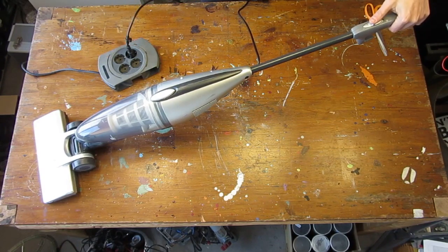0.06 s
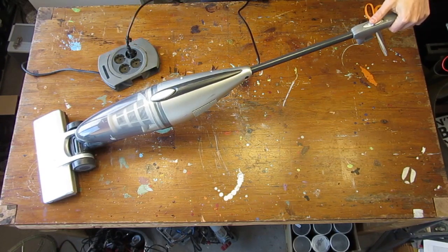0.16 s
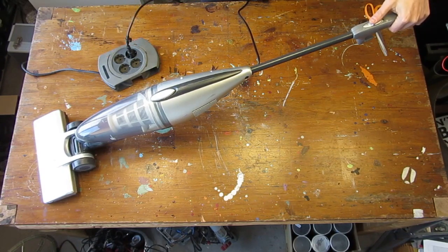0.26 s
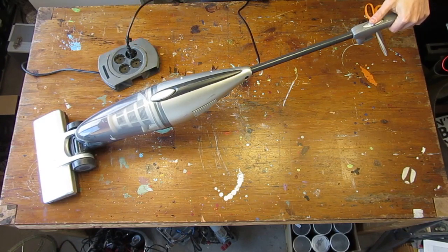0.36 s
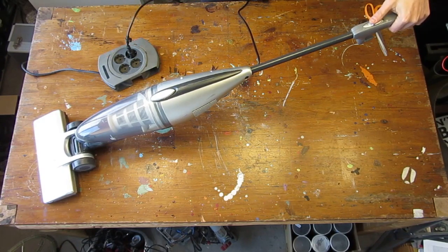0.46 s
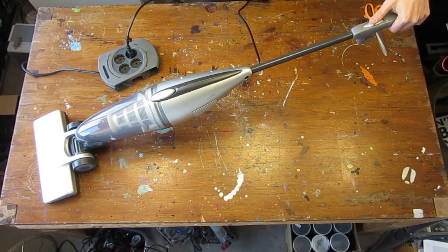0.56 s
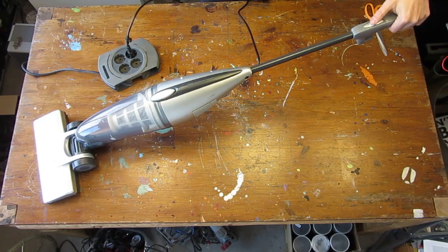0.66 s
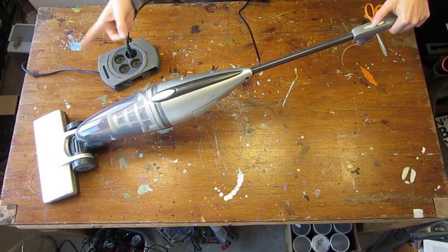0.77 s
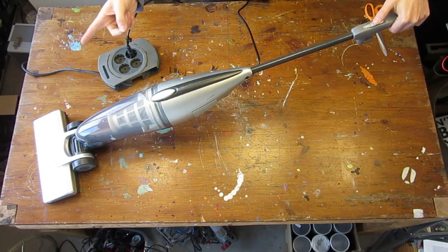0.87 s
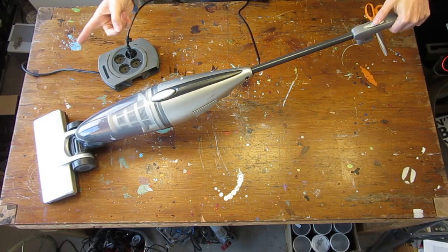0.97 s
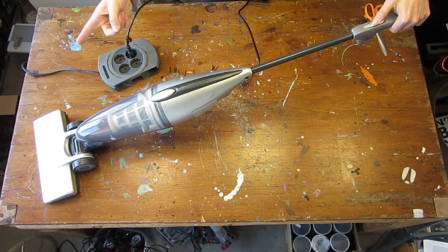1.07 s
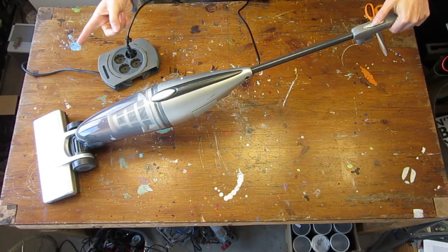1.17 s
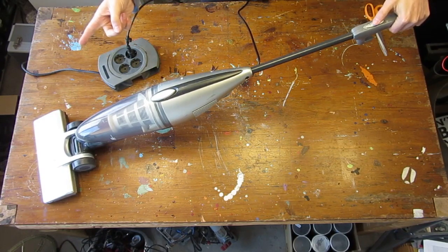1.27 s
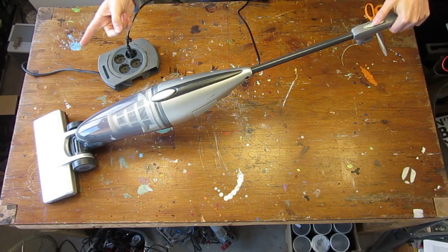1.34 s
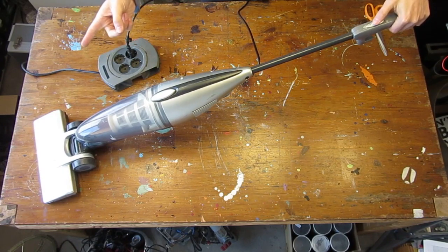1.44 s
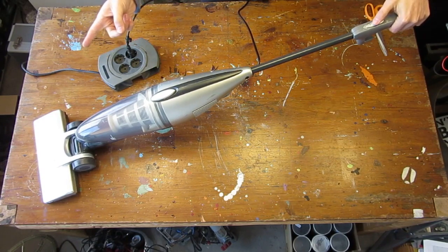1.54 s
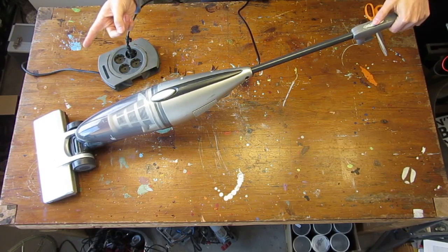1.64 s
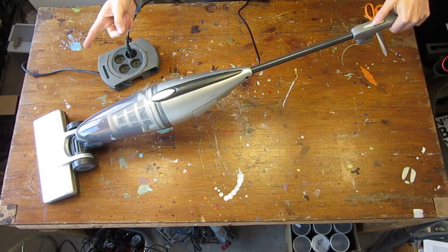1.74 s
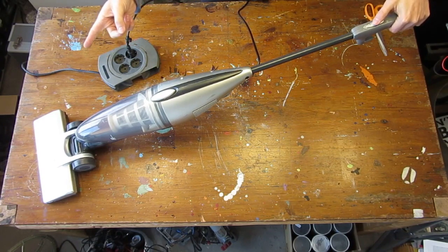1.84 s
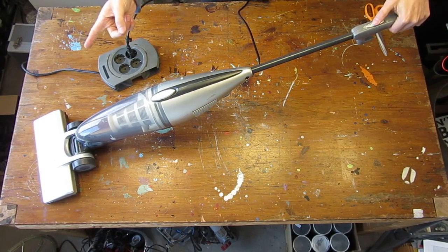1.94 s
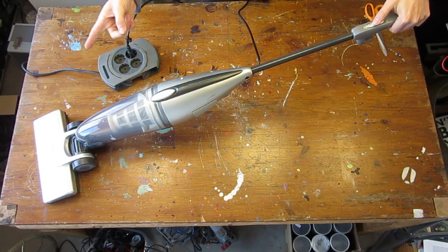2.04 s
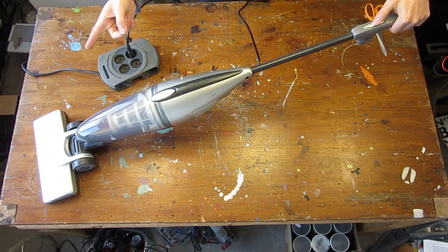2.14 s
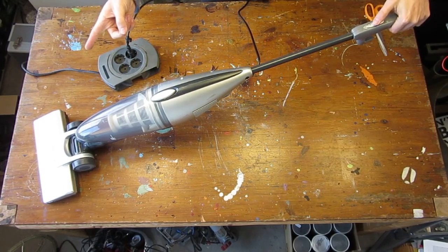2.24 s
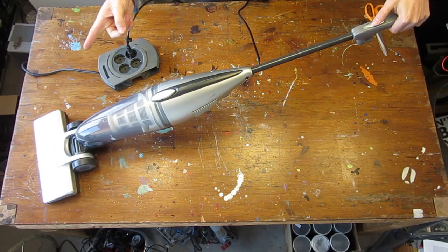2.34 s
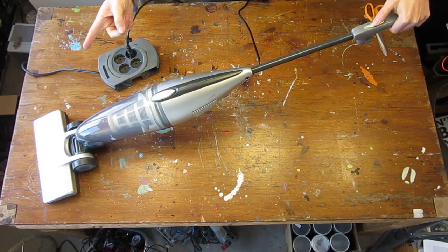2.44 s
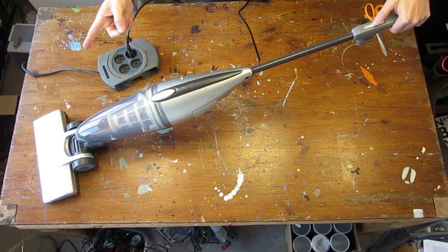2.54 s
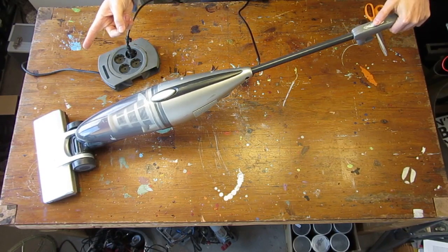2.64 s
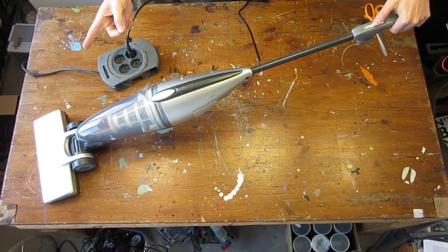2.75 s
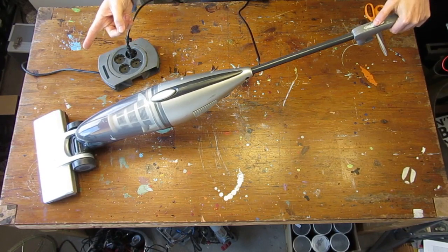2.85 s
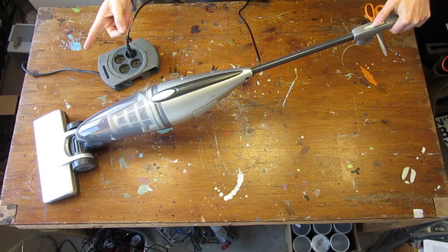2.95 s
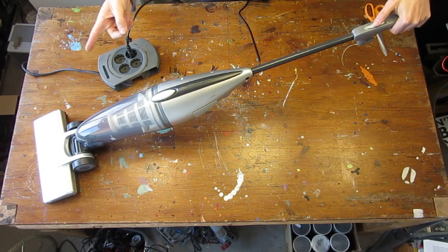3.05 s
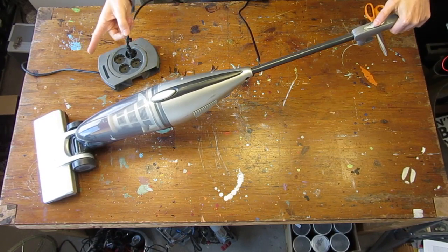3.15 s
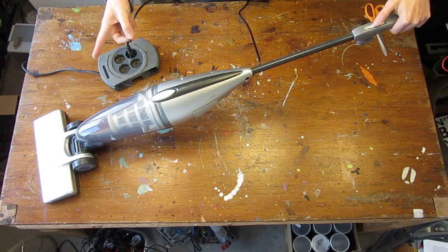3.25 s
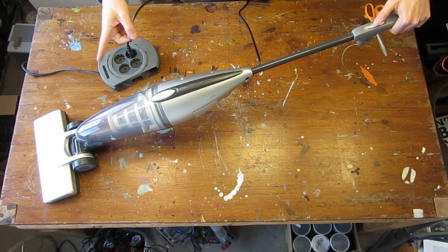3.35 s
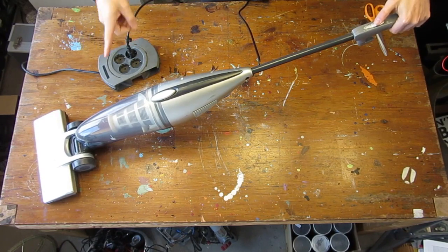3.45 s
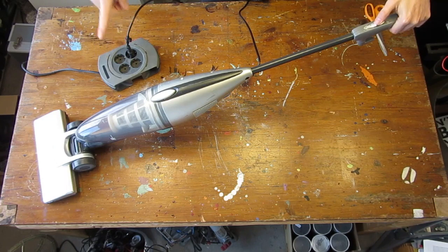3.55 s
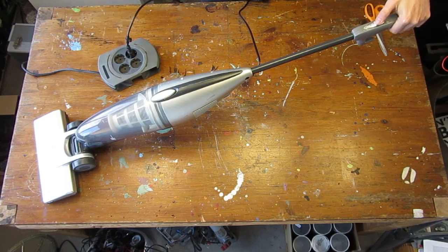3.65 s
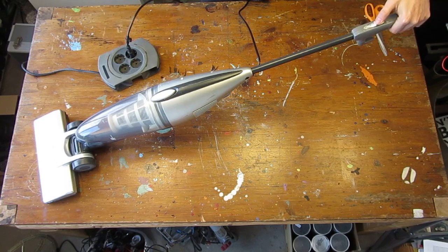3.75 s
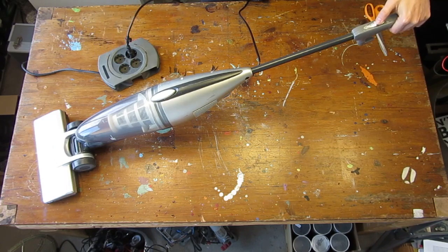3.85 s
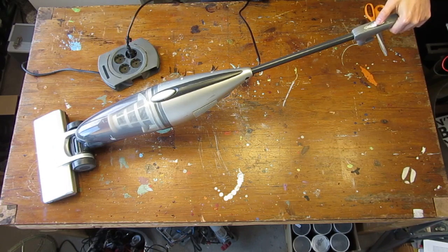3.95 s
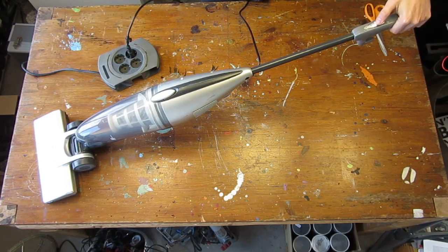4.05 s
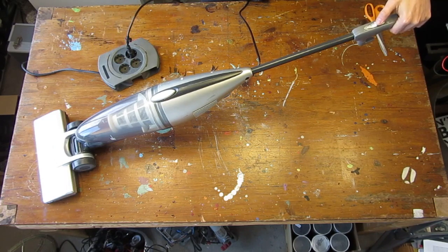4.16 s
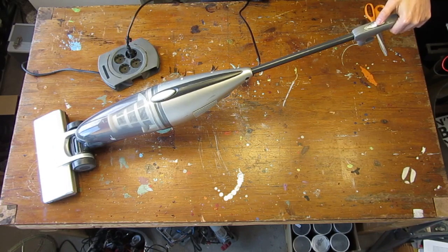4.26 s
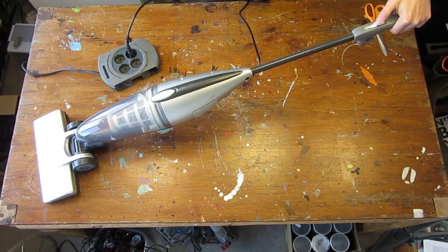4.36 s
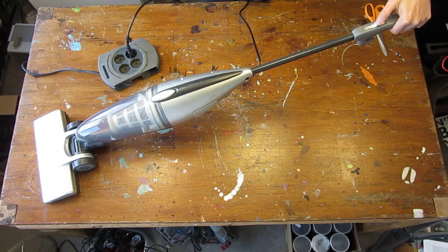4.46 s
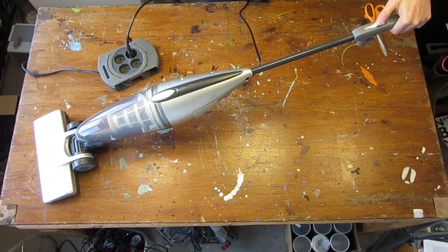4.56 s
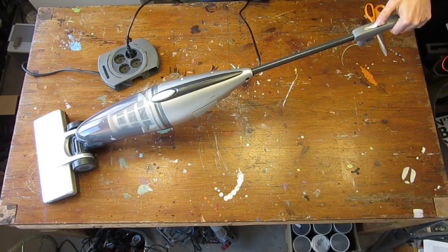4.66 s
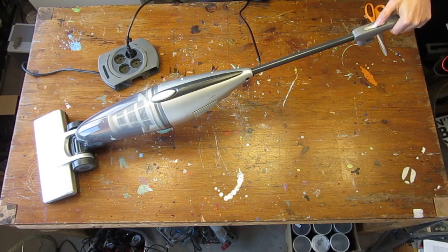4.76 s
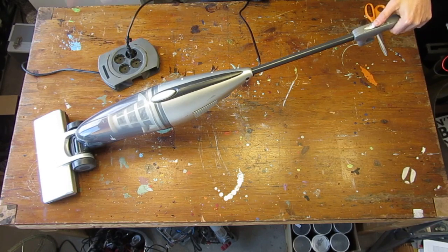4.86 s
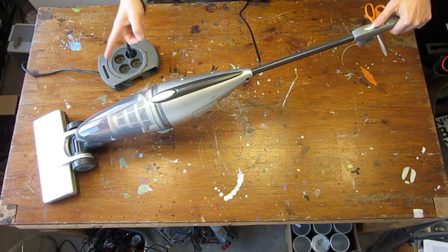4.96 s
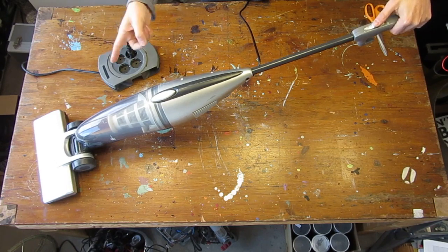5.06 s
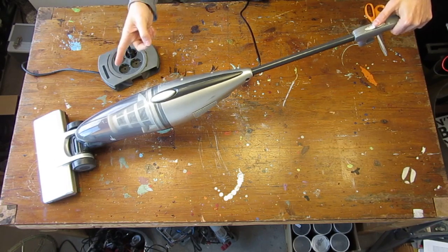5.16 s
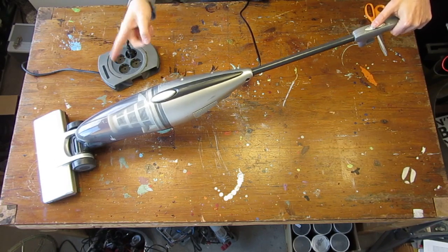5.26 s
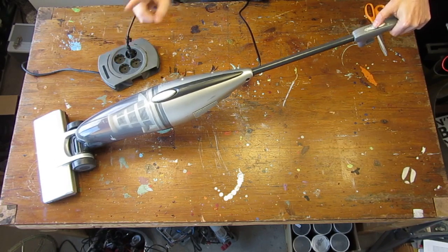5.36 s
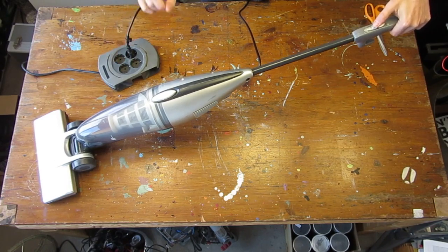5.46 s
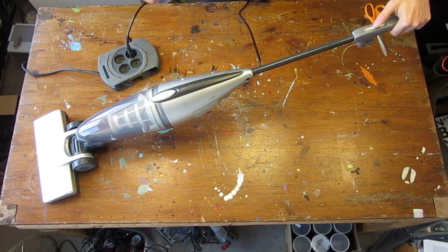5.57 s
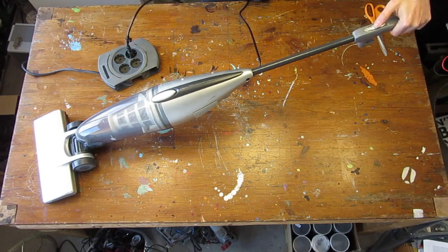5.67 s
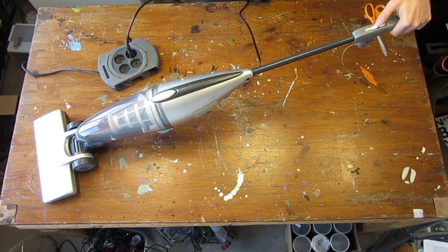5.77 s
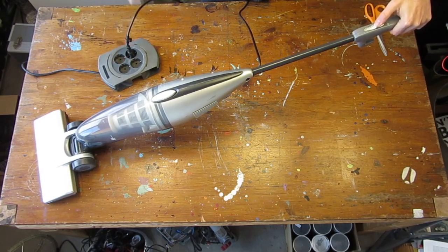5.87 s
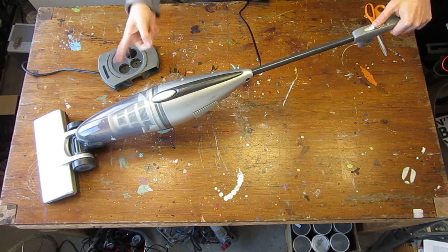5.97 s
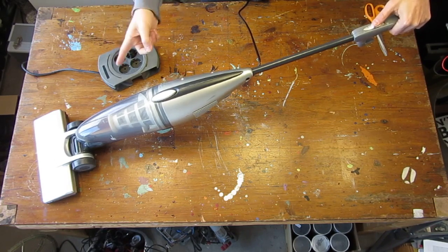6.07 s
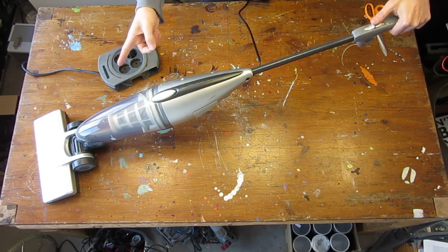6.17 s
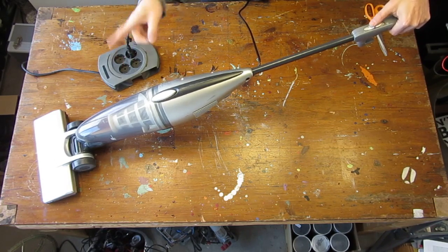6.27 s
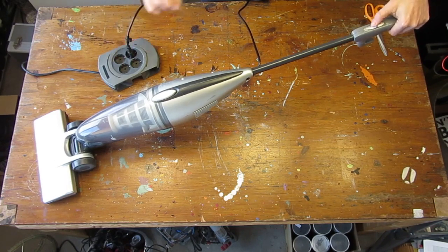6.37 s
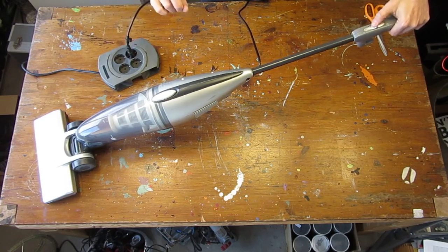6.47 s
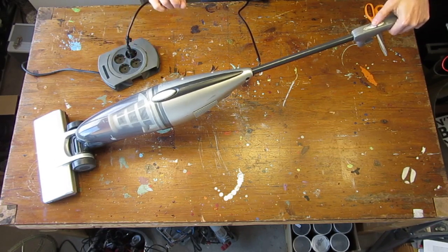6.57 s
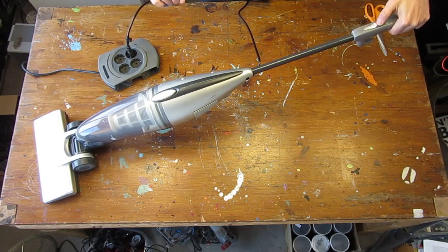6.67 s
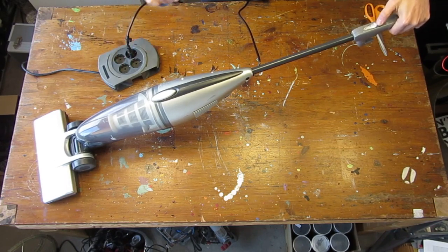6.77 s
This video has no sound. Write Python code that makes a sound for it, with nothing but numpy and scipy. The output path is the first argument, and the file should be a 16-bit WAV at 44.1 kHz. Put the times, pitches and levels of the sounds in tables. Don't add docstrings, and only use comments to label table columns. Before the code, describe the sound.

A small stick vacuum runs steadily from the start, close by on a wooden bench: a hard mid hum, a high fan whine, roaring air and bright hiss. At about 0.87 s a plastic switch snaps with a spark of noise and the motor coasts, its pitch sliding down and hiss thinning. Light scuffs or knocks come near 1.9 and 2.5 s; from about 2.4 s the slowing rotor rattles, brushes tick, and a faint squeal passes around 2.9 to 3.5 s. It sinks to a low, quiet whir by 4.8 s. Handling clicks at 4.9 s and a sharp snap at 5.0 s restart it with a buzzing, rough, rapidly rising whine. It clicks off at 5.46 s and falls, clicks on at 6.06 s and surges up, then off at 6.5 s, still coasting down at the end in a small dry workshop.

```python
import sys
import numpy as np
from scipy import signal
from scipy.fft import rfft, irfft
from scipy.io import wavfile
from scipy.ndimage import uniform_filter1d

SR = 44100
rng = np.random.default_rng(int(sys.argv[2]) if len(sys.argv) > 2 else 0)


def store_pcm(level_fs):
    pcm = np.round(np.clip(level_fs, -1, 1) * 32767).astype(np.int16)
    wavfile.write(sys.argv[1], SR, np.atleast_2d(pcm).T)


def level_to_linear(level):
    exponent = np.asarray(level, float) / 20
    return 10 ** exponent


N = 300321
LEAD = round(.4 * SR)
START_HZ = 642.7
RIPPLE_HZ = 103


def rms_one(x):
    return x / np.sqrt(np.mean(x ** 2) + 1e-20)


def in_time(rows):
    s, *columns = np.transpose(rows)
    return [np.interp(np.arange(N) / SR, s, c) for c in columns]


def at_hz(points, hz):
    point_hz, db = np.transpose(points)
    return np.interp(np.log(np.maximum(hz, 1)), np.log(point_hz), db)


def drift(rate_hz):
    r = np.exp(-80 * np.pi * rate_hz / SR)
    noise = rng.standard_normal(N // 40 + 2002)
    slow = signal.lfilter([1], [1, -2 * r, r * r], noise)[2000:]
    return np.interp(np.arange(N) / 40, np.arange(len(slow)), rms_one(slow))


def resonance(x, hz, width_hz):
    r = np.exp(-np.pi * width_hz / SR)
    zeros = np.array([1, 0, -1]) * (1 - r * r) / 2
    return signal.lfilter(zeros, [1, -2 * r * np.cos(2 * np.pi * hz / SR), r * r], x)


def butter(x, order, hz, kind="low"):
    return signal.sosfilt(signal.butter(order, hz, kind, fs=SR, output="sos"), x)


def coloured(x, spectrum):
    hz = np.arange(N // 2 + 1) * SR / N
    closed = [(spectrum[0][0] / 2, spectrum[0][1] - 40)] + list(spectrum)
    return irfft(rfft(x, N) * level_to_linear(at_hz(closed, hz)), N)


# frequency in Hz, likeness 0..1.
LIKENESS = [(30, 1), (70, 0.94), (500, .99), (1000, 0.98), (2000, 0.93), (4000, 0.71), (8000, 0.74),
            (14000, 0.75)]


def stereo_noise():
    mid, side = rfft(rng.standard_normal((2, N)))
    alike = np.clip(at_hz(LIKENESS, np.arange(N // 2 + 1) * SR / N), 0, 1)
    return irfft(np.sqrt(1 + alike) * mid + np.sqrt(1 - alike) * side * [[1], [-1]], N) / np.sqrt(2)


def workshop(x, t60_s, wet_db, side_db):
    fade = level_to_linear(-60 * np.arange(SR // 2) / SR / t60_s)
    mid, side = rng.standard_normal((2, SR // 2)) * fade / np.sqrt(np.sum(fade ** 2))
    tails = level_to_linear(wet_db) * mid + level_to_linear(side_db) * side * [[1], [-1]]
    tails[:, 0] = 1
    return signal.fftconvolve(x[None], tails, axes=1)[:, :len(x)]


# start in seconds, 1 on / 0 off.
SUPPLY = [
    (-.4, 1),
    (.8347, 0),
    (5.0077, 1),
    (5.448, 0),
    (6.0596, 1),
    (6.4779, 0),
]
TOP_HZ, RUN_UP_S, RUN_UP_SHAPE = 636.2, .1863, .5881
FRICTION_HZ, DRAG_PER_S = 144.66, .2086


def rotor():
    t = (np.arange(N + LEAD) - LEAD) / SR
    hz, supply, last_hz = np.full(N + LEAD, START_HZ), np.ones(N + LEAD), START_HZ
    for (start, on), (end, _) in zip(SUPPLY[1:], SUPPLY[2:] + [(N, 0)]):
        span = (t >= start) & (t < end)
        since = t[span] - start
        if on:
            short = 1 - (last_hz / TOP_HZ) ** (1 / RUN_UP_SHAPE)
            hz[span] = TOP_HZ * (1 - short * np.exp(-since / RUN_UP_S)) ** RUN_UP_SHAPE
        else:
            hz[span] = FRICTION_HZ * np.tan(np.arctan(last_hz / FRICTION_HZ) - DRAG_PER_S * since)
        supply[span], last_hz = on, hz[span][-1]
    return hz, signal.lfilter([.0015], [1, -.9985], supply, zi=[1])[0]


# frequency in Hz, width in Hz,
# level in dB, sign.
HUM_MODES = [(205.7, 5.2, -8.5, -1), (240, 8.2, -13.5, 1), (264.7, 8.4, -6.5, -1), (281.3, 4.8, -11.5, -1),
             (328.6, 11, -22, -1), (357, 11.6, -30, 1), (395, 25, -10.5, 1), (412, 22, -12, -1),
             (418, 6.1, -36, -1), (449.2, 25, -14, 1), (487, 6, -14, 1), (507.6, 8.5, -8, -1),
             (533.2, 8.3, -11.5, -1), (550.2, 11.7, -11.5, -1), (574.5, 17.7, -10.5, 1),
             (598.4, 6.9, -15.5, -1), (617, 18.7, -12, -1), (639, 15.7, -19, -1),
             (88, 7, -35, 1), (101, 8, -32, -1), (142, 14, -30, 1), (178, 12, -23, -1)]


def rotor_hum(turns, hz, supply):
    force = (hz / START_HZ) ** 1.63 * (1 + 0.52 * supply) * np.sin(2 * np.pi * turns)
    hum = 0
    for mode_hz, width_hz, db, sign in HUM_MODES:
        hum = hum + np.sign(sign) * level_to_linear(db) * resonance(force, mode_hz, width_hz)
    return workshop(hum, 0.12, wet_db=-51.0, side_db=-24.5)[:, LEAD:]


# multiple of shaft speed, level at full speed in dB,
# power of speed, loss when coasting in dB, gain by starting current in dB.
BLADES = [(2, -35, .1, -9, 0), (6, -44, 8, 0, 0), (7, -31.5, .1, 7, -60), (14, -26.5, 9.5, 4, 55),
          (21, -48, 2.4, 0, 30), (11, -49, 2.5, 6, 60), (12, -41, 1.7, -3, 100), (13, -40, 5, 4, 30),
          (17, -50, 4, 5, 0)]
# frequency in Hz, gain in dB.
STATOR = [(2600, -20), (3400, -8), (4000, 5), (4900, 1), (6500, -1)]
# frequency in Hz, gain in dB.
WHINE_PATH = [(250, -45), (500, -27), (900, -19), (1300, -8), (1900, 0), (2300, -1), (2700, 3), (3200, -5),
              (3800, -1), (4250, -6), (4500, 0), (5200, 1), (6400, 3), (7000, 6), (7700, 1), (8450, -4),
              (8900, 0), (14000, -4)]
ROUGH_DB = 16


def whine(turns, hz, supply):
    ripple = 1 + .12 * supply * np.sin(2 * np.pi * RIPPLE_HZ * np.arange(N + LEAD) / SR)
    inrush = supply * np.clip(1 - hz / START_HZ, 0, .53) ** 2
    tones = 0
    for k, db, power, coast_db, boost_db in BLADES:
        glide = 2 * np.pi * k * (hz - START_HZ)
        echoes_db = 3.5 * np.sin(glide * .0023) + 4 * np.sin(glide * .0059) + 3 * np.sin(glide * .0137)
        path_db = at_hz(WHINE_PATH, k * hz) + (11 <= k <= 13) * at_hz(STATOR, k * hz)
        level = level_to_linear(db + path_db + echoes_db + boost_db * inrush - coast_db * (1 - supply))
        tone = np.sqrt(2) * np.sin(2 * np.pi * (k * turns + rng.random()))
        tones = tones + level * (hz / START_HZ) ** power * tone
    tones[LEAD:] *= level_to_linear(ROUGH_DB * np.sqrt(inrush[LEAD:]) * drift(40))
    return workshop(tones, .25, wet_db=-9, side_db=-16)[:, LEAD:]


# start in seconds, roar in dB, hiss in dB, t60
# in seconds.
BURSTS = [
    (0.853, -30, -18.5, 0.18),
    (1.82, -26.5, -60, .3),
    (2.522, -20.5, -60, 0.14),
    (4.885, -56.5, -58, 0.65),
    (4.992, -50, -26.5, 0.16),
    (5.45, -30, -21, .3),
    (6.054, -40, -16.5, 0.094),
    (6.485, -35, -21, 0.2),
]
HISS_DB, HISS_FALL_DB, PULL_DB, PULL_MAX_DB = -26, 39, 19, 4.5
DRIVEN_DB, COAST_DB, COAST_FALL_DB = -24.5, -27.5, 5.5
LOWER_DB, LOWER_PULL_DB = -8.5, 6.5
RATTLE_HZ, RATTLE_WIDTH_HZ = 304, 1.5
RATTLE_DB, RATTLE_FALL_DB, RATTLE_BEND_DB = -22, 40, 84
RATTLE_LOWER_DB, RATTLE_LOWER_RISE_DB = -3, 23.0
KNOCK_SHARE, RATTLE_KNOCK_SHARE = .11, .45
TICK_DB, TICK_RISE_DB, TICK_MAX_DB = -14, 38, -1.5


def effort(hz, supply):
    slowed, missing = np.log10(START_HZ / hz), 1 - hz / START_HZ
    under = np.maximum(np.log10(RATTLE_HZ / hz), 0)
    loose = (1 - supply) * (1 + np.tanh((RATTLE_HZ - hz) / RATTLE_WIDTH_HZ)) / 2

    coast = level_to_linear(COAST_DB - COAST_FALL_DB * slowed)
    rattle = level_to_linear(RATTLE_DB - RATTLE_FALL_DB * under - RATTLE_BEND_DB * under ** 3)
    roar = supply * level_to_linear(DRIVEN_DB) + (1 - supply - loose) * coast + loose * rattle

    lower_db = (1 - loose) * LOWER_DB + supply * LOWER_PULL_DB * missing
    lower_db = lower_db + loose * (RATTLE_LOWER_DB + RATTLE_LOWER_RISE_DB * under)

    pull_db = np.minimum(PULL_DB * missing, PULL_MAX_DB)
    bright = level_to_linear(HISS_DB - HISS_FALL_DB * slowed + supply * pull_db)
    tick_db = TICK_DB + (1 - supply) * np.minimum(TICK_RISE_DB * slowed, TICK_MAX_DB - TICK_DB)
    share = KNOCK_SHARE + loose * (RATTLE_KNOCK_SHARE - KNOCK_SHARE)

    for s, roar_db, hiss_db, t60_s in BURSTS:
        since = np.maximum(np.arange(N) / SR - s, 0)
        shape = level_to_linear(-60 * since / t60_s) * np.minimum(since / 0.0085, 1)
        roar = np.hypot(roar, level_to_linear(roar_db) * shape)
        bright = np.hypot(bright, level_to_linear(hiss_db) * shape)
    return roar, lower_db, bright, share, tick_db


def ring_modes(x, modes):
    out = 0
    for k, (hz, width_hz, db) in enumerate(modes):
        out = out + (-1) ** k * level_to_linear(db) * resonance(x, hz, width_hz)
    return rms_one(out)


# frequency in Hz, width in Hz, level in dB.
ROAR = [(785, 51, 2), (1001.3, 4.3, 9.5), (1192, 102, -1), (1181, 29, -7), (1288, 30, 4.5), (1409, 44, 0.5),
        (1432, 17.8, 7), (1920, 130, -6.5), (1824, 13, -0.5)]
# frequency in Hz, width in Hz, level in dB.
LOWER_ROAR = [(199, 90, -6), (273.7, 40, 0.5), (293.5, 33, -1), (394.4, 22.2, 6), (504, 30.4, 3.5),
              (560, 193, -7.5)]


def air(turns, hz, roar_gain, lower_db, hiss_gain, share):
    knocks = 1 - share + share * 1.24 * np.exp(-4.0 * (turns % 1)) * level_to_linear(3.1 * drift(72))
    upper, lower = stereo_noise() * knocks, stereo_noise() * knocks
    broad = rms_one(butter(upper, 2, [850, 1950], "band"))
    body = 0.69 * ring_modes(upper, ROAR) + 0.6 * broad + level_to_linear(lower_db) * ring_modes(lower, LOWER_ROAR)
    body = butter(body, 12, 1930)
    body = butter(body, 2, 120, "high")
    duct = rms_one(resonance(resonance(upper, 2730, 190), 2730, 190))
    return roar_gain * (body + level_to_linear(-22.5) * duct) + hiss_gain * hiss(hz, patchy_db=1.5)


# frequency in Hz, level in dB per Hz.
HISS = [(1900, 14), (2300, -11.5), (2650, -1.5), (3050, -7), (3770, -2), (4200, -4), (5030, -5), (5660, -4),
        (6460, -1), (7860, -0.5), (9490, -0.5), (10300, -4.5), (13700, -12), (14900, -26)]


def hiss(hz, patchy_db):
    bright, together, out = coloured(stereo_noise(), HISS), drift(20.0), 0
    edges_hz = 2300 * 2 ** (np.arange(10) / 3)
    for low, high in zip(edges_hz, edges_hz[1:]):
        band = butter(bright, 2, [low, high], "band")
        slowing = (hz / START_HZ) ** (0.3 * np.clip(np.log2(5000 / low), 0, 2))
        out = out + band * slowing * level_to_linear(patchy_db * (0.11 * together + drift(5.3)))
    return rms_one(bench_echoes(out))


def bench_echoes(x):
    return x + 0.04 * np.roll(x, 23, axis=1) + 0.028 * np.roll(x, 71, axis=1)


# frequency in Hz, level in dB.
BRUSH = [(3000, -15), (4300, -7), (5000, -1.5), (6000, -4.5), (7600, -2), (10000, -1), (11500, -7),
         (14000, -26)]
# time in seconds, level in dB.
SQUEAL = [(2.84, -85), (2.9, -44.5), (3.3, -44), (3.45, -50), (3.55, -90)]


def brushes(turns, gain):
    angle = 2 * np.pi * np.arange(256) / 256
    pattern = rng.standard_normal(256) + .17 * np.sin(24 * angle) + .3 * np.sin(36 * angle)
    scratch = np.interp(turns % 1 * 256, np.arange(256), pattern, period=256)
    ticks = coloured(scratch, BRUSH)
    evened = ticks / np.sqrt(uniform_filter1d(ticks ** 2, size=4096) + 1e-12)
    squeal = rms_one(resonance(resonance(stereo_noise(), 7560, 400), 7560, 400))
    return workshop(evened * gain, .3, wet_db=-1, side_db=-14) + squeal * level_to_linear(in_time(SQUEAL)[0])


def mains_buzz(hz, supply):
    current = supply * level_to_linear(39.0 * np.clip(1 - hz / START_HZ, 0, 1))
    buzz = level_to_linear(-53 + 1.7 * drift(13.0)) * np.sin(2 * np.pi * RIPPLE_HZ * np.arange(N) / SR)
    shake = [(25, -24.), (60, -11.0), (90, 0.0), (130, 0.0), (200, 6.0), (400, -61.0)]  # Hz, dB
    rumble = level_to_linear(-54) * rms_one(coloured(stereo_noise(), shake))
    return current * (buzz + rumble)


# frequency in Hz, level in dB per Hz.
FLOOR = [(18, -68), (30, -41), (373, 9), (1270, -1), (2070, -52), (2620, -21), (2980, -19), (4640, -18),
         (6020, 6), (14900, 5)]
FLOOR_DB = -46.5


def room_floor():
    return level_to_linear(FLOOR_DB - 6) * rms_one(coloured(stereo_noise(), FLOOR))


# time in seconds, peak in dB, tail in dB, thud in dB.
CLICKS = [(0.8674, -22, -10.5, -42), (1.907, -35, -13, -40), (4.8944, -32, -20, -40),
          (4.984, -29.5, -15.5, -40), (4.9966, -31, -20, -40), (5.0164, -13, -15, -43),
          (5.0392, -18.5, -14, -43), (5.469, -14.5, -18, -38), (6.0553, -12.5, -20.5, -42),
          (6.07, -25, -22, -40), (6.5011, -18, -12.5, -40)]
# frequency in Hz, level in dB, t60 in seconds.
SWITCH = [(634, -7, 0.062), (1160, -27, 0.026), (1530, -41, .03), (1940, -8, 0.013), (2430, -6, 0.037),
          (4420, -0.5, 0.012), (6900, 7, 0.0015)]


def switch():
    s, peak_db, tail_db, thud_db = np.transpose(CLICKS)
    at = np.round(s * SR).astype(int)
    strength_db = rng.normal(0, 2.5, (len(s), len(SWITCH)))
    rings, tail, thud = np.zeros((3, N)) + 1e-18
    for k, (hz, db, t60_s) in enumerate(SWITCH):
        clicks = np.zeros(N) + 1e-18
        clicks[at] = level_to_linear(peak_db + db - 10 + strength_db[:, k])
        r, w = level_to_linear(-60 / (t60_s * SR)), 2 * np.pi * hz / SR
        rings = rings + signal.lfilter([0, np.sin(w)], [1, -2 * r * np.cos(w), r * r], clicks)
    tail[at], thud[at] = level_to_linear(peak_db + tail_db), level_to_linear(peak_db + thud_db)
    tail = signal.lfilter([1], [1, -level_to_linear(-60 / (.12 * SR))], tail)
    noise = coloured(stereo_noise(), [(400, 28.0), (1500, 23.0), (5000, 8.0), (9000, -19.0), (15000, -32.0)])
    bench = 300 * resonance(resonance(thud, 84, 45), 80, 80)
    return workshop(rings, 1.0, wet_db=4.0, side_db=-7.0) + tail * noise + bench


def scene():
    hz, supply = rotor()
    turns = np.cumsum(hz) / SR
    motor = rotor_hum(turns, hz, supply) + whine(turns, hz, supply)
    turns, hz, supply = turns[LEAD:], hz[LEAD:], supply[LEAD:]
    roar, lower_db, bright, share, tick_db = effort(hz, supply)
    motor = motor + air(turns, hz, roar, lower_db, bright, share)
    motor = motor + brushes(turns, bright * level_to_linear(tick_db))
    return motor + mains_buzz(hz, supply) + room_floor() + switch()


def roll_off(x):
    return signal.sosfilt(signal.butter(12, 15090, fs=SR, output="sos"), x)


def record(dry):
    return roll_off(dry)


dry = scene()
out = record(dry)
store_pcm(out)
```